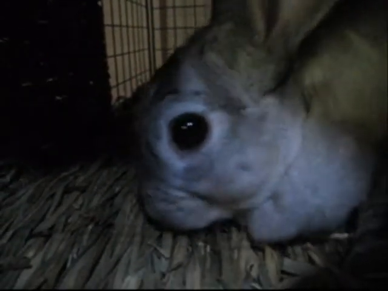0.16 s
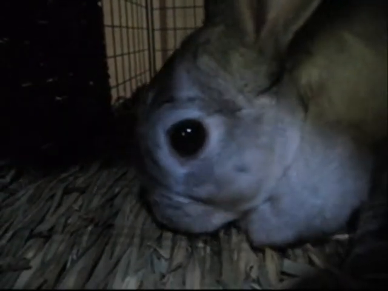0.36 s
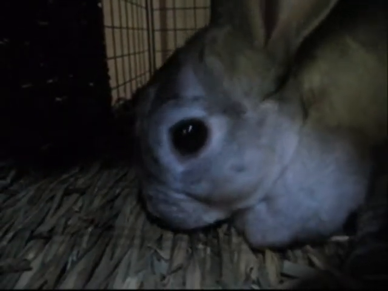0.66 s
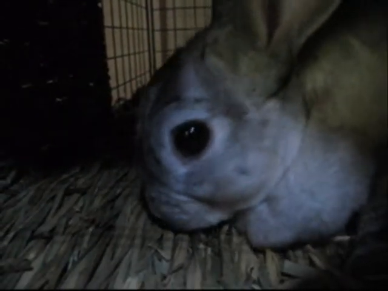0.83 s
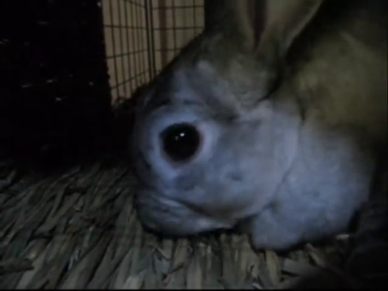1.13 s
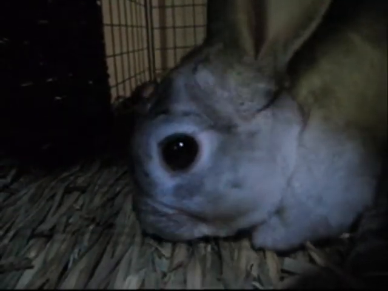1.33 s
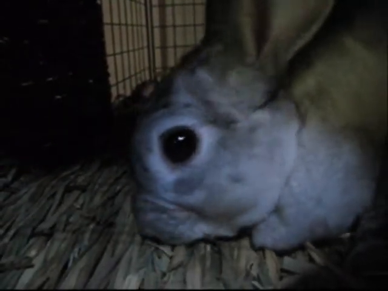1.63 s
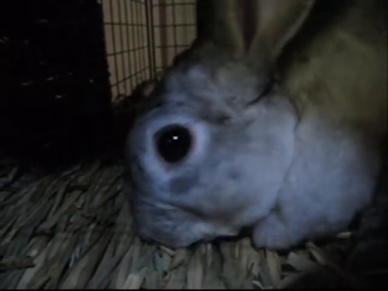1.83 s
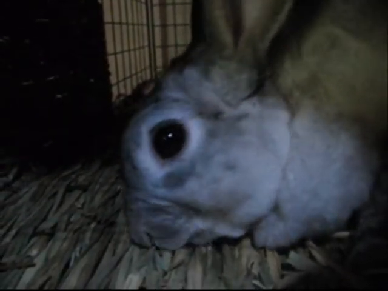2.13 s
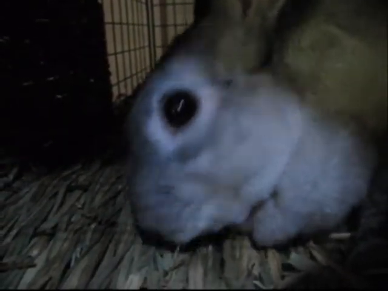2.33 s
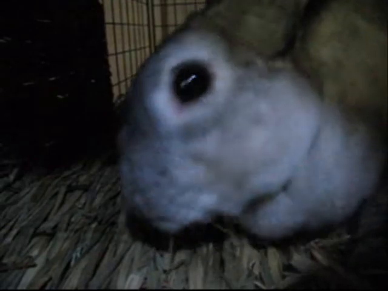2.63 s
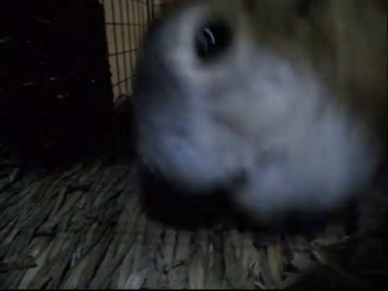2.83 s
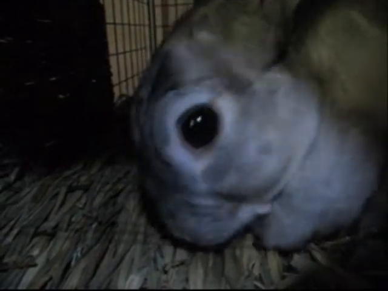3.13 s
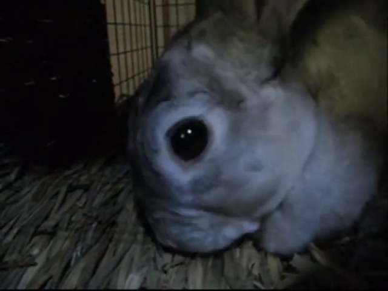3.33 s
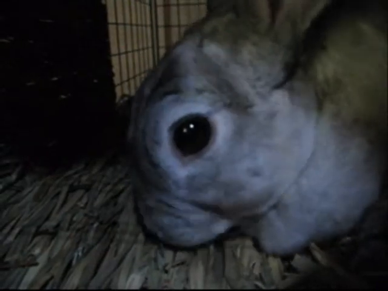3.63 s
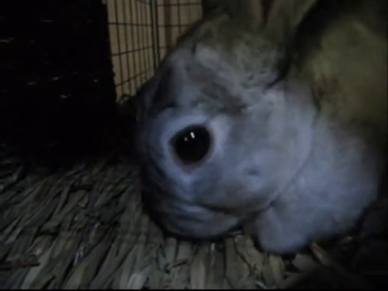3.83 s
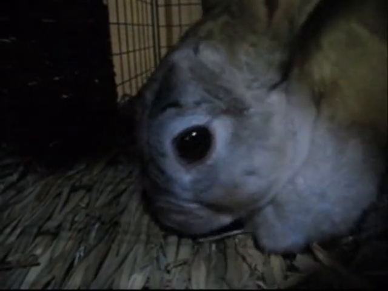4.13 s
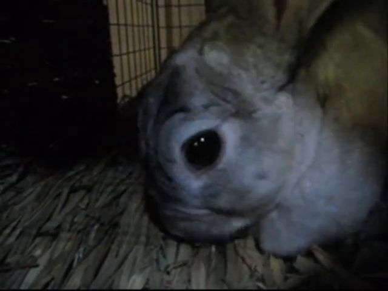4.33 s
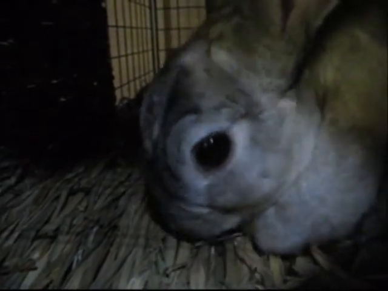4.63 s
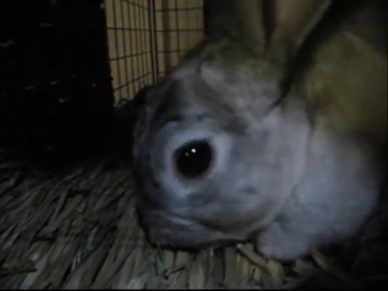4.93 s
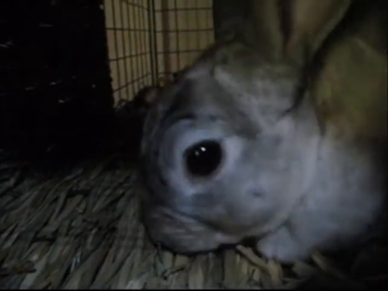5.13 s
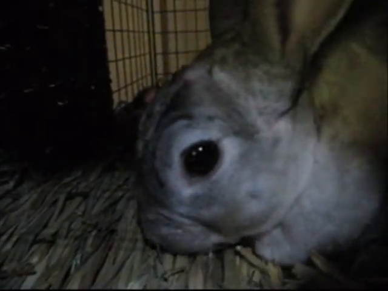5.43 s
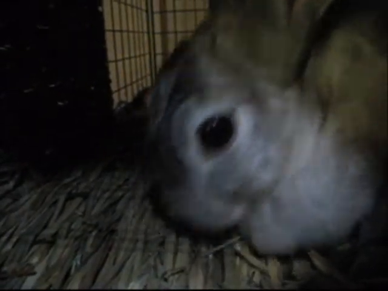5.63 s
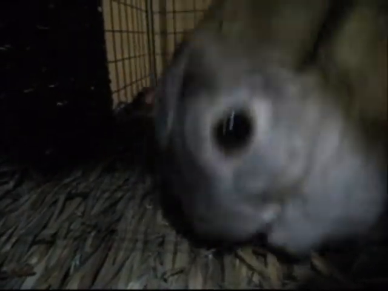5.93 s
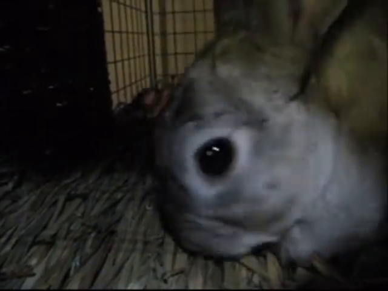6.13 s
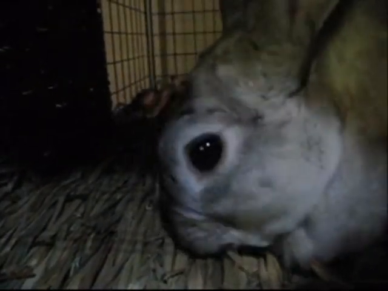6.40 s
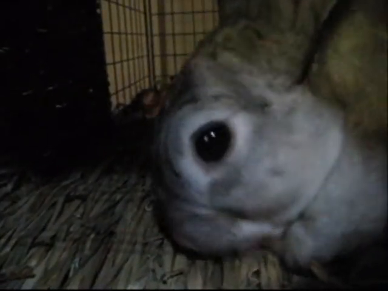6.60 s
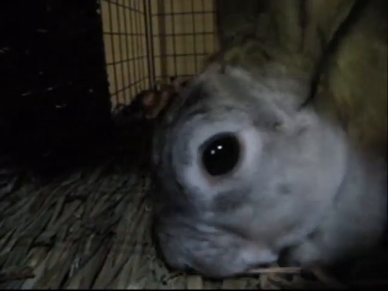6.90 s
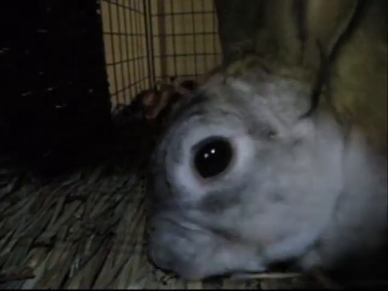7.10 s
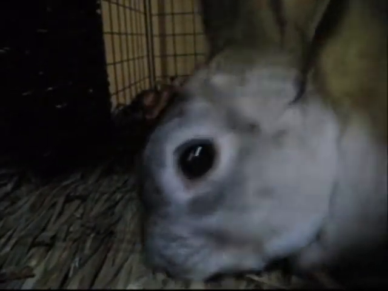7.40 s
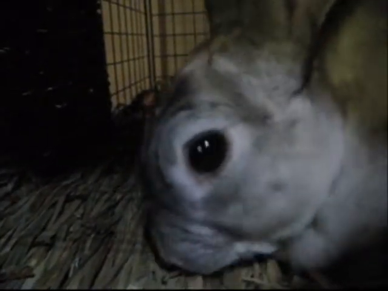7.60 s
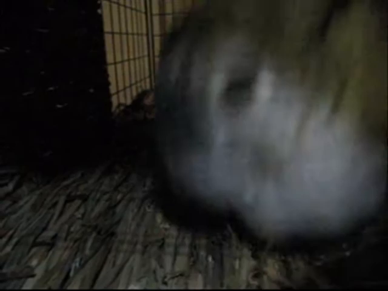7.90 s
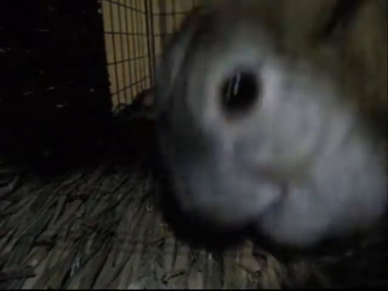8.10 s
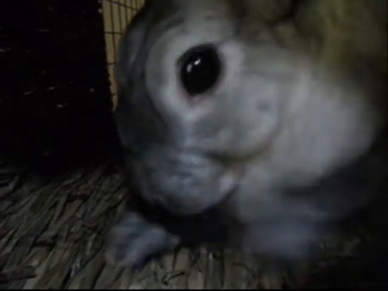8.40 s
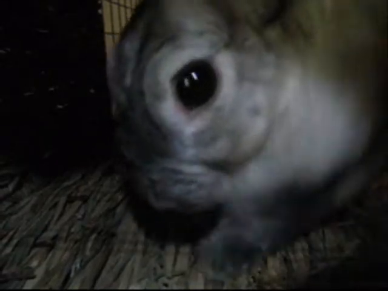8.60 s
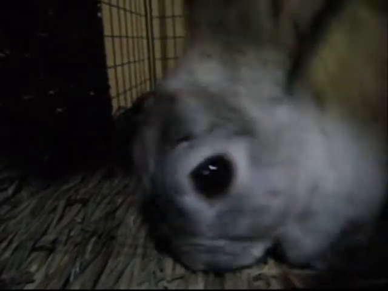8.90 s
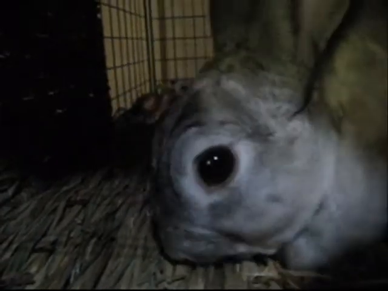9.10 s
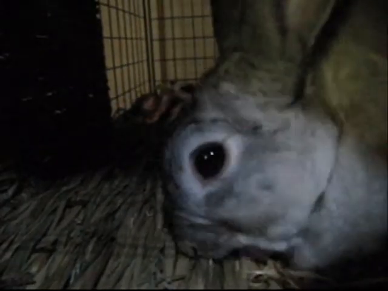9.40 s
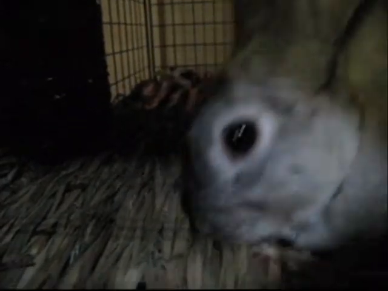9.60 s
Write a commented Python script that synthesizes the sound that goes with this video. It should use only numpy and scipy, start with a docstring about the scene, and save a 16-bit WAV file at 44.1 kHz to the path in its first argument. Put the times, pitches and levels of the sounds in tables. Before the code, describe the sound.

Dry woven grass is pulled and bitten by a rabbit right beside a cheap, grainy microphone. Short scratchy rustles stop abruptly as strands break with sharp clicks and soft thumps. An early flurry gives way to scattered ticks, then stronger bursts and a crowded, loud finale. A faint mid-pitched appliance whine, whirring noise and an early distant low drone sit behind, the level ducking and creeping back.

```python
"""A rabbit tugs and gnaws at a mat of dry woven grass beside a small camera, near a whining, whirring appliance.
Starts with two snaps and a short rustle, gain ducked; pulls from 1 to 2.8 s, with a drone fading before 4 s.
Sparse snaps follow, then harder pulls from 5.6 s; loudest and densest from 7.4 to 9.7 s.
Snaps, thumps: noise in resonances. Rustles: dense blips. Appliance: sines and coloured noise.
The camera's gain ducks on loud snaps and creeps back; it holds coarse 8-bit steps about 11 thousand times a second."""
import sys
import numpy as np
from scipy import signal
from scipy.fft import rfft, irfft
from scipy.io import wavfile
from scipy.ndimage import uniform_filter1d

SR = 44100
rng = np.random.default_rng(int(sys.argv[2]) if len(sys.argv) > 2 else 0)


def unload_wav(signal):
    """Save mono or channel-first audio to the path in sys.argv[1] as 16-bit WAV at rate SR, clipped to [-1, 1]."""
    wavfile.write(
        sys.argv[1],
        SR,
        np.round(np.clip(np.atleast_2d(signal).T, -1, 1) * 32767).astype(np.int16),
    )


N = 429975

# clearest strands snapping, ahead of gain control: t/s, crack peak/dB, brightness f/Hz, mat knock re crack peak/dB
CLEAR_SNAPS = [(0.0065, -10, 4350, -21), (0.0149, -2, 4450, -13.5), (0.099, -16.5, 4530, -26),
               (1.0893, -28, 4200, -7), (1.3224, -26, 3380, 0), (1.3603, -13.8, 4230, -33),
               (1.5071, -24.5, 4800, -16), (1.5398, -6.5, 4300, -17), (1.551, -16, 4550, -3),
               (1.5711, 2, 4830, -19), (1.7447, -13, 4350, -16), (1.7831, -1, 4700, -19),
               (1.82, -16, 2240, -23), (1.894, -17, 4300, -19), (1.9604, -18, 3680, -19),
               (2.0076, -9, 4400, -21), (2.0373, -7, 3880, -20), (2.0481, -2, 4400, -15),
               (2.1017, -11.5, 4020, -13.5), (2.2017, -13.5, 3270, -10.5), (2.219, -16.5, 4500, -18),
               (2.2494, 3.5, 4100, -19), (2.3677, -8.5, 4600, -22), (2.4032, -17, 3250, -6),
               (2.6328, -21, 2880, -5), (2.8233, 4.5, 2970, -10.5), (3.282, -24.5, 3200, -5.5),
               (3.429, -25, 3080, -9), (3.4815, -21.5, 2540, -28), (3.6941, -24, 3600, -3),
               (3.8905, -20, 2400, -10), (4.2566, -28, 2270, -5.5), (4.454, -28, 1950, -15),
               (4.6375, -21.5, 3400, -15), (4.9846, -24, 3260, -10), (5.067, -17, 2360, -30),
               (5.078, -10, 3760, -22), (5.6399, -15.8, 4530, -21), (5.6655, -18, 4570, -25),
               (5.6767, -7, 4460, -23), (5.6867, -19, 3600, -9), (5.7179, -5.5, 3140, -11),
               (6.3246, -14, 4110, -9), (6.3332, -7, 3370, -14), (6.3476, -2, 3080, -43),
               (7.0371, -18.5, 4330, -26), (7.0848, -8, 4150, -18), (7.0966, -13, 3960, -17),
               (7.1093, 2, 3900, -23), (7.1292, 7.5, 3870, -21), (7.3461, 4, 4250, -23),
               (7.4403, -4, 3760, -19), (7.4725, -9, 4480, -7.5), (7.4761, -10, 3670, -7),
               (7.4877, 14.5, 3520, -20), (7.8815, -5, 3830, -19), (7.8956, -7, 3730, -11),
               (7.9166, -19, 3240, 1), (7.93, 8.5, 3340, -10.5), (8.3321, -19, 4680, -8),
               (8.36, -7, 3620, -15.5), (8.4188, 2.5, 4230, -13), (8.4442, -9, 3350, -9),
               (8.4635, -8, 4690, -21), (8.4709, 7, 3020, -15), (8.5283, 4, 3120, -25),
               (8.5415, 5.5, 3950, -11), (8.571, 0, 3680, -22), (8.6112, 5.0, 4520, -21),
               (8.621, 2, 3280, -15), (8.6697, 9, 3950, -19), (8.6852, 3, 3900, -12),
               (8.7245, -1, 3400, -21), (8.7858, 0, 3880, -25), (8.7971, 3, 3340, -25),
               (8.818, -2, 3440, -26), (8.8923, 2.5, 5050, -29), (8.914, -4, 4500, -13.5),
               (8.9409, -3, 3600, -16), (9.1242, -15.5, 2900, -26), (9.1574, -6, 3670, -10.5),
               (9.1767, -18, 3230, -3), (9.2156, -19, 4200, -7), (9.2586, -2, 3500, -10),
               (9.2696, -5.5, 3760, -24), (9.2769, 0, 4200, -32), (9.323, -5.5, 2870, -19),
               (9.5017, -2.5, 3700, -10.5), (9.5142, 10, 3800, -14.5), (9.525, 4, 3540, -24),
               (9.541, 7, 3510, -26), (9.552, -7, 3480, -17), (9.6398, -10.5, 3900, -10),
               (9.6654, -7, 3130, -11.5), (9.7083, -2, 4430, -20.5)]
LIMIT_DB = -11.5  # peak limit of the gain control


def gain_of(db):
    """dB to an amplitude factor."""
    return 10 ** (np.asarray(db) / 20)


def evened(x):
    """Scales to rms 1."""
    return x / np.sqrt(np.mean(x ** 2) + 1e-20)


def add(mix, start_s, sound):
    """Mixes a sound in at start_s, cut at the end of the mix."""
    part = mix[round(start_s * SR):][:len(sound)]
    part += sound[:len(part)]


def coloured(x, points):
    """Filters x by a spectrum of (f/Hz, level/dB) points, interpolated over log frequency."""
    hz, db = np.transpose(points)
    bins_hz = np.fft.rfftfreq(len(x), 1 / SR)
    response = gain_of(np.interp(np.log(bins_hz + 1), np.log(hz), db))
    return irfft(rfft(x) * response, len(x))


def resonate(x, hz, width_hz):
    """One damped resonance: a complex one-pole filter."""
    pole = np.exp((2j * np.pi * hz - np.pi * width_hz) / SR)
    return signal.lfilter([1], [1, -pole], x).imag


def crackle(per_s, spread_db, pitch_count=18):
    """Fibres parting at random: short blips of a few cycles, of random size and one of a set of pitches."""
    # rustle colour: f/Hz, relative level per Hz/dB
    grass_colour = [(100, -9), (450, -4.5), (900, 2), (1460, -11), (2260, -0.5), (4000, 2.5), (5500, 10.5),
                    (9000, -19.5)]
    hit = rng.random(N) < per_s / SR
    size = gain_of(spread_db * np.minimum(rng.exponential(1, N), 4)) * rng.standard_normal(N) * hit
    kind = rng.integers(0, pitch_count, N)
    t = np.arange(-100, 200) / SR
    out = np.zeros(N)
    for k, hz in enumerate(np.geomspace(900, 6500, pitch_count)):
        width_cycles = 1.6 * rng.uniform(0.4, 2.0)
        envelope = np.exp(-(t * hz / width_cycles) ** 2)
        blip = envelope * np.sin(2 * np.pi * hz * t) * np.sqrt(hz)
        out += signal.oaconvolve(size * (kind == k), blip)[:N]
    return evened(coloured(out, grass_colour))


def appliance_tones():
    """Steady whine: sines at random phase."""
    # whine partials: f/Hz, rms level before the trim/dB
    whine_partials = [(557.0, -35.5), (575.68, -46), (59.2, -57), (118.4, -62), (250.4, -57), (442.3, -56),
                      (508.9, -57), (643.6, -59), (708.9, -53), (842.3, -57), (908.7, -56), (975.55, -52),
                      (1018.7, -58), (1042.1, -58), (1109, -60), (1156.8, -56), (1175.5, -57),
                      (1242.1, -58)]
    trim_db = 0.07
    t = np.arange(N) / SR
    out = np.zeros(N)
    for hz, db in whine_partials:
        out += gain_of(db + trim_db) * np.sqrt(2) * np.sin(2 * np.pi * (hz * t + rng.random()))
    return out


def appliance_whirr(swell):
    """Coloured noise whose level wavers with the swell."""
    # whirr colour: f/Hz, relative level per Hz/dB
    whirr_colour = [(15, -11.5), (40, -3.5), (60, -2.5), (95, -15), (150, -7), (195, 0), (260, -1.5),
                    (375, -8.5), (503, -3), (630, -4.5), (790, -8.5), (968, -4.5), (1075, -8.5),
                    (1190, -8.5), (1380, -18.5), (5500, -26)]
    level_db, waver_db = -39.5, 0.97
    noise = evened(coloured(rng.standard_normal(N), whirr_colour))
    return noise * gain_of(level_db + waver_db * swell)


def far_drone(swell):
    """Low sine far off whose pitch shifts, wavers with the swell, and fades."""
    # drone course: t/s, centre f/Hz, rms level/dB
    drone_course = [(0, 148.8, -51.5), (1.5, 149.2, -46.5), (2.501, 148.9, -51), (3.5, 147, -50.5),
                    (3.8, 146.1, -67), (9.75, 147, -68)]
    waver_hz = 2.5
    s, hz, db = np.transpose(drone_course)
    t = np.arange(N) / SR
    turns = np.cumsum(np.interp(t, s, hz) + waver_hz * swell) / SR
    return gain_of(np.interp(t, s, db)) * np.sqrt(2) * np.sin(2 * np.pi * turns)


def grass_stir():
    """Faint sparse ticking of the grass throughout."""
    rms_db = -59.5
    return gain_of(rms_db) * crackle(per_s=220, spread_db=2.0)


def background():
    """Appliance, drone and ticks; one slow random swell moves both whirr and drone."""
    swell = evened(uniform_filter1d(rng.standard_normal(N), 4000))
    return appliance_tones() + appliance_whirr(swell) + far_drone(swell) + grass_stir()


def pull():
    """Level of the pulling: swells, holds and stops short when the grass lets go."""
    # pulls on the grass: t/s, length/s, held rustle level ahead of gain control/dB
    grass_pulls = [(0, 0.026, -35), (1.05, 0.15, -52), (1.28, 0.082, -38.5), (1.41, 0.066, -44.5),
                   (1.483, 0.11, -38.5), (1.577, 0.12, -38.5), (1.71, 0.13, -37.5), (1.852, 0.055, -42),
                   (1.934, 0.092, -35), (2.066, 0.099, -42), (2.164, 0.088, -38.7), (2.357, 0.061, -37.5),
                   (2.519, 0.064, -44), (2.589, 0.16, -45), (2.795, 0.028, -37.5), (3.936, 0.14, -52),
                   (4.663, 0.3, -57), (4.95, 0.065, -42), (5.044, 0.061, -40), (5.188, 0.12, -47.5),
                   (5.36, 0.4, -54.5), (5.624, 0.082, -36.5), (6.028, 0.1, -45.5), (6.22, 0.097, -39.5),
                   (6.311, 0.031, -30.5), (6.744, 0.25, -52), (6.974, 0.085, -44), (7.064, 0.052, -40),
                   (7.278, 0.16, -34), (7.427, 0.038, -30.4), (7.462, 0.038, -20.5), (7.858, 0.085, -25.5),
                   (8.353, 0.11, -32.5), (8.432, 0.073, -19), (8.484, 0.11, -20), (8.589, 0.1, -21.5),
                   (8.7, 0.051, -24), (8.759, 0.069, -28), (8.826, 0.043, -29.5), (8.871, 0.091, -25.5),
                   (8.944, 0.076, -39), (9.105, 0.077, -44), (9.178, 0.13, -32), (9.296, 0.2, -40),
                   (9.486, 0.083, -15.5), (9.573, 0.13, -27.5)]
    rise_share, fall_share = 0.31, 0.13  # of the length
    level = np.zeros(N)
    for s, length_s, db in grass_pulls:
        part = np.linspace(0, 1, round(length_s * SR))
        rise = np.minimum(part / rise_share, 1)
        fall = np.minimum((1 - part) / fall_share, 1)
        add(level, s, gain_of(db) * rise * fall)
    return level


def rustles(level):
    """Dense clumped crackle that follows the pull."""
    clump_db = 2.9 * evened(uniform_filter1d(rng.standard_normal(N), 130))
    return level * evened(gain_of(clump_db) * crackle(per_s=8000, spread_db=1.5))


def snaps(rows):
    """Each break builds up as fibres give way, cracks, shivers on and knocks the mat."""
    lead_s = 0.004
    base_width_s, shorter_per_db = 0.000264, 0.07  # harder cracks are shorter
    shiver_base_db, shiver_drop = -11.5, 0.32  # drop: dB per dB of crack over the limit
    t = np.arange(800) / SR - lead_s
    shiver = np.where(t < 0, np.exp(t / 0.0015), np.exp(-t / 0.0049))
    noises = rng.standard_normal((len(rows), 2, len(t)))
    length_factors = rng.uniform(0.83, 1.9, len(rows))
    out = np.zeros(N)
    for (s, db, hz, knock_db), (crack_noise, knock_noise), factor in zip(rows, noises, length_factors):
        width_s = base_width_s * factor * np.exp(-shorter_per_db * max(db, -25))
        shiver_db = shiver_base_db - shiver_drop * max(db - LIMIT_DB, 0)
        envelope = np.exp(-(t / width_s) ** 2) + gain_of(shiver_db) * shiver
        drive = np.diff(envelope * crack_noise, prepend=0)
        crack = evened(resonate(drive, hz, 1300)) + 1.2 * evened(resonate(drive, 4000, 5000))
        knock = resonate(knock_noise * np.exp(-abs(t) / 0.00059), 650, 600)
        snap = crack / abs(crack).max() + gain_of(knock_db) * knock / abs(knock).max()
        add(out, s - lead_s, gain_of(db) * snap)
    return out


def small_snaps(level):
    """Rows for lesser strands that break at random, as hard as the grass is pulled."""
    per_s, knock_db = 45, -14
    over_rustle_db, scatter_db = 14, 7
    when, size, bright = rng.random((int(per_s * N / SR), 3)).T
    at = (when * (N - 400) + 200).astype(int)
    pull_db = 20 * np.log10(level[at] + 1e-9)
    peak_db = pull_db + over_rustle_db + scatter_db * (2 * size - 1)
    return [(i / SR, db, 3400 + 3000 * b, knock_db) for i, db, b in zip(at, peak_db, bright)]


def thumps():
    """Each clear snap gives the woven mat a dull, quickly damped push: decaying noise in two resonances."""
    low_hz, high_hz = 69.7, 279
    base_db, thump_share = -24.5, 0.6  # share: dB of thump per dB of knock
    t = np.arange(4000) / SR
    pitches_hz = low_hz * (high_hz / low_hz) ** rng.random(len(CLEAR_SNAPS))
    noises = rng.standard_normal((len(CLEAR_SNAPS), len(t)))
    out = np.zeros(N)
    for (s, db, _, knock_db), hz, noise in zip(CLEAR_SNAPS, pitches_hz, noises):
        push = resonate(noise * np.exp(-t / 0.0088), hz, 120)
        push = resonate(push, hz, 280)
        peak_db = thump_share * (db + knock_db) + base_db
        add(out, s, gain_of(peak_db) * push / abs(push).max())
    return out


def gain_control(x):
    """Peaks over the limit pull the gain down almost at once; the cut in dB decays slowly."""
    attack_s, return_s = 0.0001, 0.35  # time constants
    start_duck_db = 14.5
    over_db = np.maximum(20 * np.log10(abs(x) + 1e-9) - LIMIT_DB, 1e-9)
    over_db = np.where(np.arange(N) == 0, start_duck_db, over_db)
    # running maximum of exponentially decaying cuts
    climb = np.arange(N) / SR / return_s
    held_db = np.exp(np.maximum.accumulate(np.log(over_db) + climb, axis=1) - climb)
    keep = np.exp(-1 / (attack_s * SR))
    cut_db = signal.lfilter([1 - keep], [1, -keep], held_db)
    return x / gain_of(cut_db)


def scene():
    """Everything at one microphone."""
    level = pull()
    grass = rustles(level) + snaps(CLEAR_SNAPS) + snaps(small_snaps(level)) + thumps()
    return (background() + grass)[None]


def record(dry):
    """Gain control, low-pass, then coarse values held at a slow rate, which mirrors sound into the treble."""
    steps_per_s, step, offset = 11026, 1 / 128, -0.005  # step and offset: full scale = 1
    smooth_hz, edge_hz = 6000, 15550
    hiss_db = -60.5  # converter noise, rms ahead of rounding
    smooth = signal.oaconvolve(gain_control(dry), signal.firwin(41, smooth_hz, fs=SR)[None], "same")
    tick = np.floor(np.arange(N) * steps_per_s / SR)
    hiss = gain_of(hiss_db) * rng.standard_normal(N)[tick.astype(int)]
    taken = smooth[:, np.ceil(tick * SR / steps_per_s).astype(int)]
    held = step * np.round((taken + hiss + offset) / step)
    edge = signal.firwin(511, edge_hz, window=("kaiser", 9), fs=SR)
    return signal.oaconvolve(held, edge[None], "same")


dry = scene()
out = record(dry)
unload_wav(out)
```